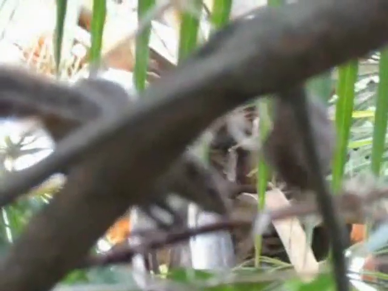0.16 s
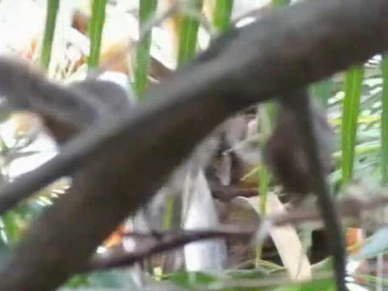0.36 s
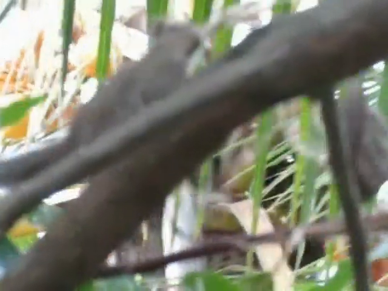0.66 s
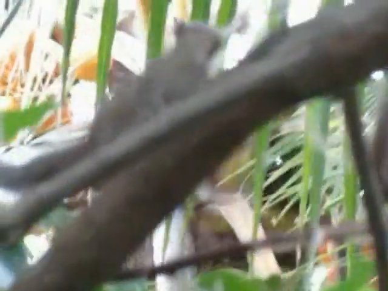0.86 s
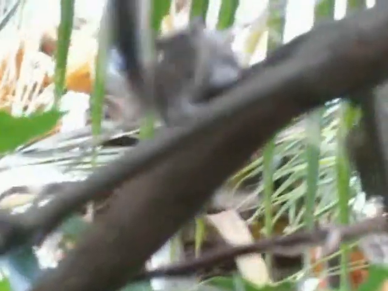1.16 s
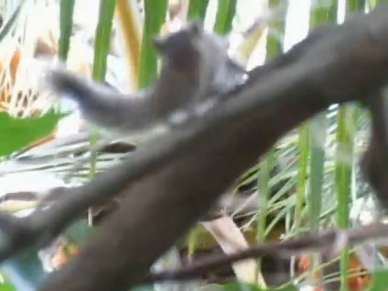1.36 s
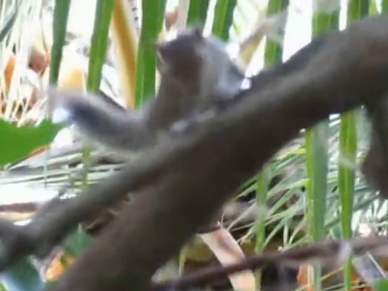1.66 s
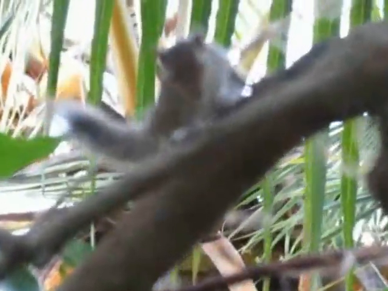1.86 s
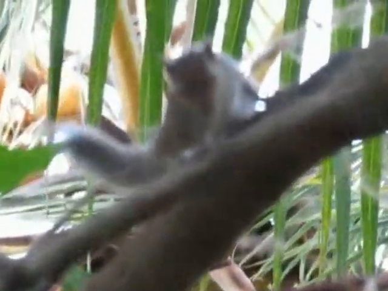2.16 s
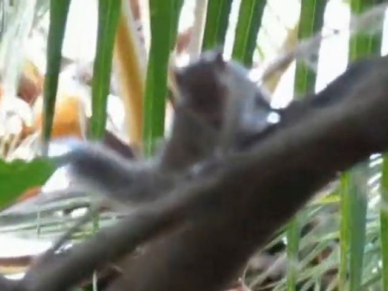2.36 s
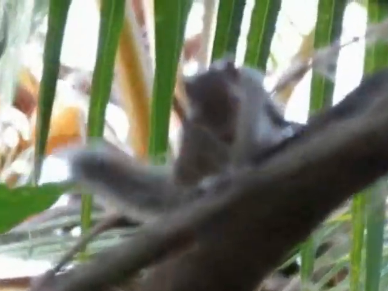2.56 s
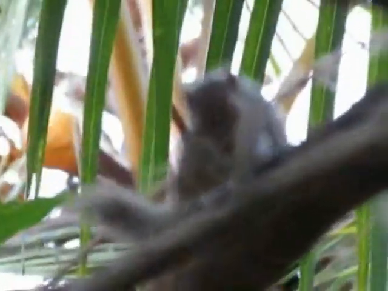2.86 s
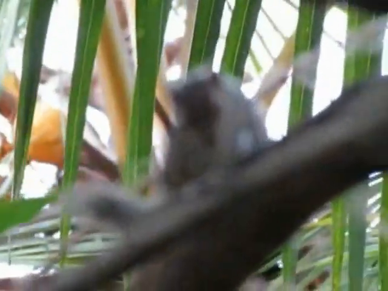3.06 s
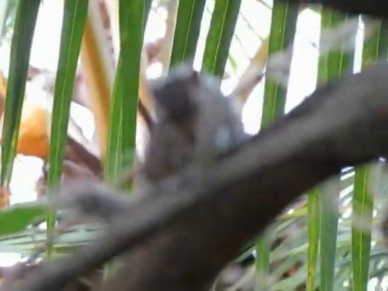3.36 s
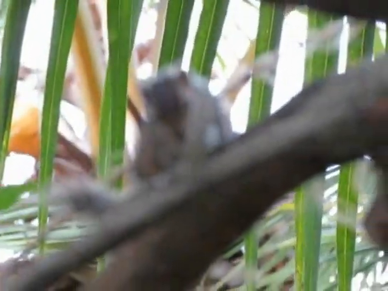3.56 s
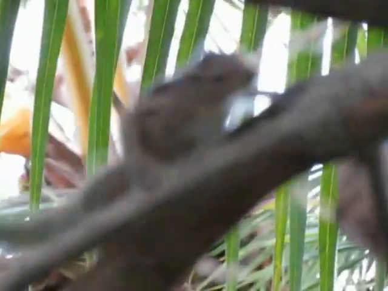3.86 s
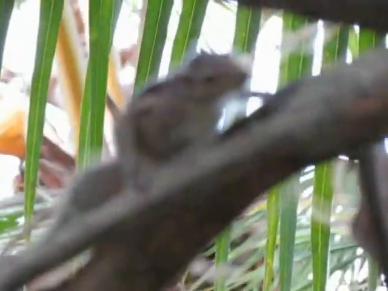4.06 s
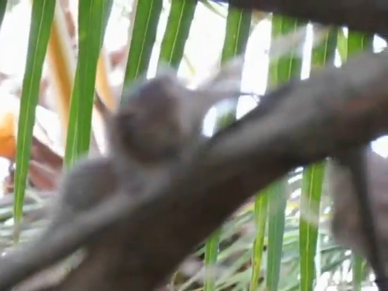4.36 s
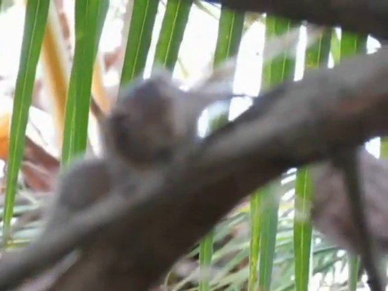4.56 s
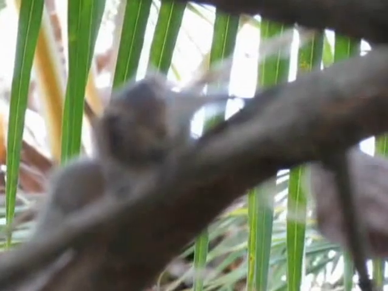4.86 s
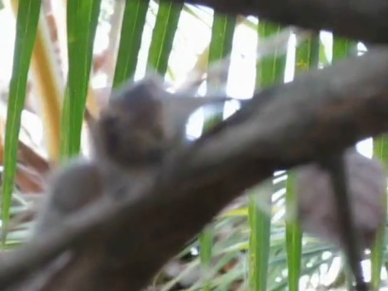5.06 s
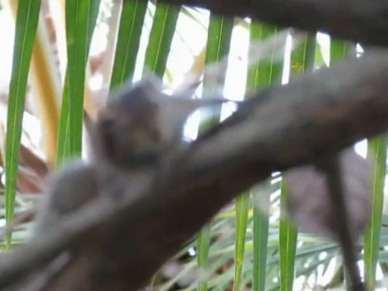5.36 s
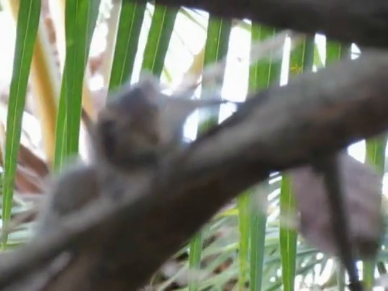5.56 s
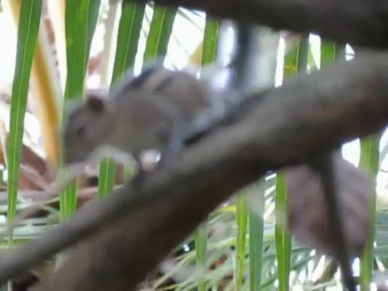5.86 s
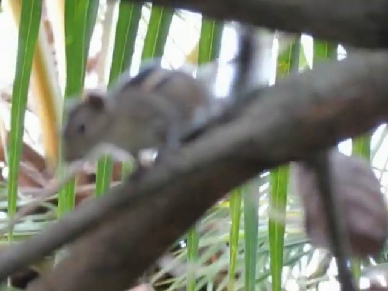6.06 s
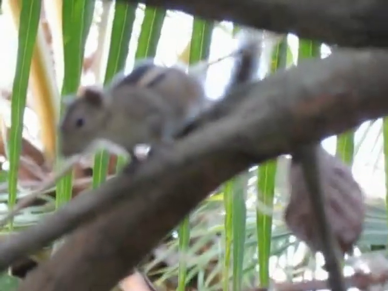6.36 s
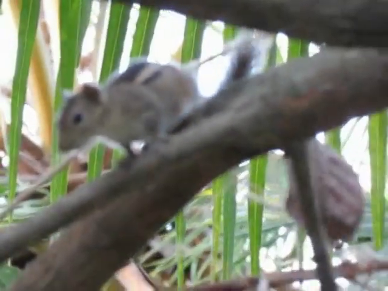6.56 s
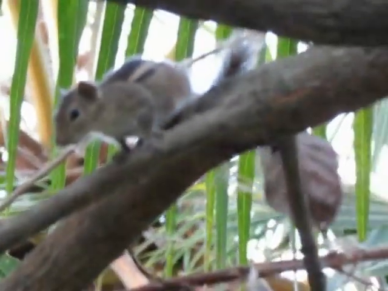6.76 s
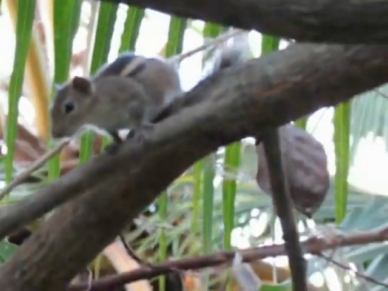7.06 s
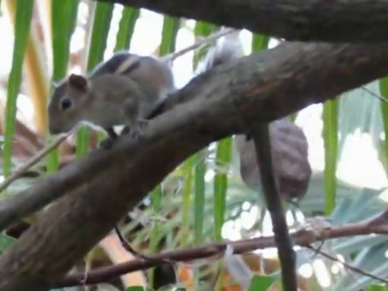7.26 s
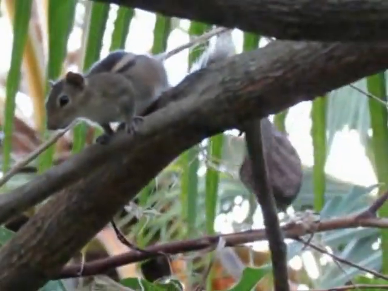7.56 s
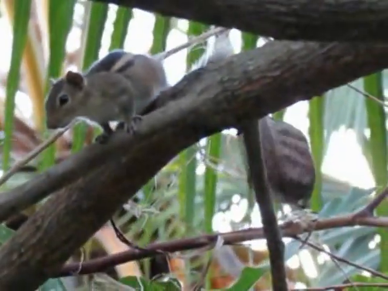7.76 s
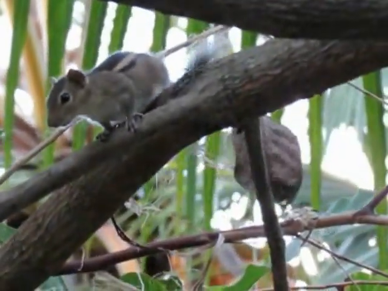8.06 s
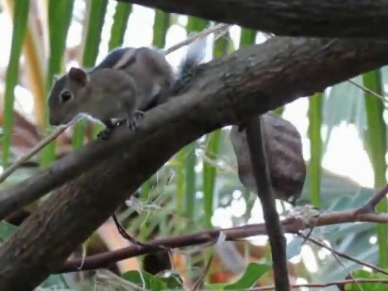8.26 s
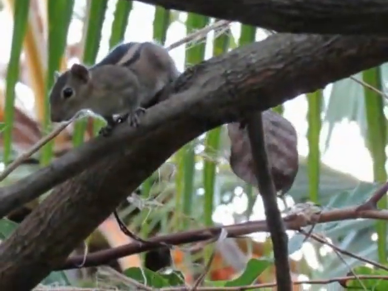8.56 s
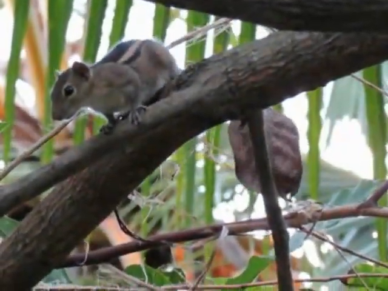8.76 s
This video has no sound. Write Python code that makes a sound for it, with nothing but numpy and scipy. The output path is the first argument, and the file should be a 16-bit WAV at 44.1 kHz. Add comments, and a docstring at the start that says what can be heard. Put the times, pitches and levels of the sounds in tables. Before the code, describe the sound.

Piercing squirrel chirps ring and echo among trees, rapid at first then sparser, with faint far birds, breathy hisses, handling clicks and low traffic wash.

```python
"""Distant traffic, as shaped noise, runs throughout; a faint squirrel chirp opens and short hisses begin to puff.
Louder squirrel chirps follow from the trees of a yard: near-pure arched tones that walls and leaves throw back.
Far birds call in arches from 2 s and peep from 3.2 s, a raspy noise-band chirr swells near 5.2 s,
taps ring the camera body from 5.8 s and horns sound, as fluttering partials, at 6.5 and 8.6 s.
The camera limits peaks, then holds samples off a faster clock, which scatters faint copies of every tone."""
import sys
import numpy as np
from scipy import signal
from scipy.fft import rfft, irfft
from scipy.io import wavfile
from scipy.ndimage import uniform_filter1d

SR = 44100
rng = np.random.default_rng(int(sys.argv[2]) if len(sys.argv) > 2 else 0)


def inscribe(sig):
    """Save sig as 16-bit PCM at rate SR to the path in sys.argv[1].

    A 1-D sig is mono; a 2-D sig holds one channel per row.
    Samples are clipped to [-1, 1] before scaling.
    """
    pcm = np.round(np.clip(np.atleast_2d(sig).T, -1, 1) * 32767)
    wavfile.write(sys.argv[1], SR, pcm.astype(np.int16))


N = 392049
TIME = np.arange(N) / SR


def amp(db):
    """Level law: 20 dB is a factor of ten in amplitude."""
    return 10 ** (np.asarray(db, float) / 20)


def unit(x):
    """Normalization: the sound at rms 1."""
    return x / np.sqrt(np.mean(x ** 2))


def noise(colour):
    """Spectral shaping: white noise weighted by (frequency [Hz], level [dB]) points on a log axis."""
    hz, db = np.transpose(colour)
    bins = np.maximum(np.arange(N // 2 + 1) * SR / N, 1)
    gain = amp(np.interp(np.log(bins), np.log(hz), db))
    return irfft(rfft(rng.standard_normal(N)) * gain, N)


def walk(rate):
    """Random modulation: values drawn at rate [Hz], held, averaged twice over one hold; rms 1."""
    k = int(SR / rate)
    held = np.repeat(rng.standard_normal(N // k + 1), k)
    smooth = uniform_filter1d(uniform_filter1d(held, k), k)
    return unit(smooth[:N])


def add(out, s, x):
    """Superposition: mix x into out from time s [s]."""
    i = max(int(s * SR), 0)
    out[i:i + len(x)] += x[:N - i]


def traffic():
    """Broadband noise: far rumble and hiss whose level drifts slowly."""
    # traffic spectrum: (frequency [Hz], relative level [dB])
    spectrum = [(20, -32), (45, 3), (90, 0.5), (250, -1.5), (400, -7), (850, -8.5), (1300, -14),
                (2200, -14), (3300, -16), (4500, -17), (5600, -23.5), (8000, -25.5), (11000, -24.5),
                (14000, -58)]
    level_db = -40 + 0.84 * walk(2.28)
    return amp(level_db) * unit(noise(spectrum))


def yard(x, wet_db):
    """Reverberation: noise under bunched early reflections and an exponential tail, wet_db [dB] re x in all."""
    # bunches of reflections: (delay [s], spread [s], relative level [dB])
    bunches = [(.015, 0.047, 9), (.057, 0.0077, -9), (.11, .02, -7), (.2, .03, -26)]
    tail_db, tail_t60_s, tail_onset_s = 1, 0.68, 0.022
    t = np.arange(SR) / SR
    decay = 1000 ** (-2 * t / tail_t60_s) * 2 * np.log(1000) / tail_t60_s  # unit energy
    power = amp(2 * tail_db) * decay * np.clip(t / tail_onset_s, 0, 1)
    for delay, spread, db in bunches:
        bell = np.exp(-.5 * ((t - delay) / spread) ** 2) / (spread * np.sqrt(2 * np.pi))
        power += amp(2 * db) * bell
    response = np.sqrt(power) * rng.standard_normal(SR)
    wet = signal.fftconvolve(x, response)
    return amp(wet_db) * wet * np.linalg.norm(x) / np.linalg.norm(wet)


def whistles(calls, rise, bend, onset_db, end_db, octave_db, waver_hz, wet_db):
    """Frequency modulation: a tone nears its top pitch, then slides away; each call has its own reflections."""
    ease = 1.3  # radians of a quarter sine that the slide runs through: it ends before levelling off
    beam_loss_db = 7  # direct sound lost over the slide
    attack_s, release_s = 0.0048, 0.019
    out = np.zeros(N)
    waver = waver_hz * walk(60)
    rasp = 0.85 * walk(250)  # radians
    flutter_db = 2.55 * walk(120)
    for s, length, start_hz, top_hz, end_hz, db, pivot, fall, direct_db in calls:
        u = np.arange(int(length * SR)) / (length * SR)  # share of the call elapsed
        fall = np.clip(fall, 0, .9)
        i = int(s * SR)
        span = slice(i, i + len(u))

        hz = top_hz - (top_hz - start_hz) * np.clip(1 - u / rise, 0, 1) ** 2
        drop = np.clip((u - fall) / (1 - fall), 0, 1) ** bend
        hz -= (top_hz - end_hz) * (np.sin(ease * drop) / np.sin(ease)) ** 2  # the slide eases in
        phase = 2 * np.pi * np.cumsum(hz + waver[span]) / SR
        octave = amp(octave_db) * np.sin(2 * phase + rasp[span])  # the overtone is hoarser

        contour_db = np.interp(u, [0, np.clip(pivot, .05, .9), 1], [onset_db, 0, end_db])
        off_top_db = -1.2 * (top_hz - hz) / 1000  # weaker below the top pitch
        swell = amp(db + contour_db + flutter_db[span] + off_top_db)
        attack = np.clip(u * length / attack_s, 0, 1) ** 0.67
        release = np.clip((1 - u) * length / release_s, 0, 1)
        tone = np.sqrt(2) * swell * attack * release * (np.sin(phase) + octave)

        # the closing mouth beams less: direct sound falls against the echo
        beam_db = direct_db - beam_loss_db * drop
        add(out, s, amp(beam_db) * tone)
        add(out, s, yard(tone, wet_db))
    return out


def call_shapes(calls, start, end, pivot, fall):
    """Similarity: one contour for all calls of a kind, start and end pitch in proportion to the top."""
    return [(s, length, start * hz, hz, end * hz, db, pivot, fall, 0) for s, length, hz, db in calls]


def faint_and_far_calls():
    """Tonal calls: faint squirrel chirps and far bird peeps of flat pitch, and far arched bird notes."""
    # flat calls, faint squirrel chirps at .002 and 1.64 s and far bird peeps:
    # (time [s], length [s], top pitch [Hz], level at the pivot [dB])
    flat_calls = [(.002, 0.075, 5010, -44), (1.64, 0.057, 4550, -29.5), (3.2, 0.072, 5910, -45),
                  (3.37, 0.04, 5950, -47), (4.625, 0.068, 817, -44), (4.66, .062, 3800, -52)]
    # far arched bird calls: (time [s], length [s], top pitch [Hz], level at the pivot [dB])
    arches = [(2.0, 0.088, 1100, -46.5), (4.24, 0.09, 1142, -46), (4.39, 0.1, 1138, -44.5),
              (6.69, 0.1, 1107, -46), (6.865, .09, 1127, -42.5), (7.075, 0.1, 1083, -43)]
    # start and end over top pitch; pivot of the level and start of the slide as shares of the length
    calls = call_shapes(arches, start=.63, end=.61, pivot=.49, fall=.52)
    calls += call_shapes(flat_calls, start=.985, end=.98, pivot=.43, fall=.5)
    return whistles(calls, rise=0.312, bend=1.3, onset_db=9.0, end_db=16.5,
                    octave_db=-16, waver_hz=7.9, wet_db=-4)


def chirp_shapes():
    """Kinematics: pitch drop and slide speed set each chirp's length; top pitch sets its loudest point."""
    # squirrel chirps: (time [s], time until the slide [s], start [Hz], top [Hz], end [Hz], level [dB],
    # direct sound re that level [dB]: lower when hidden or turned away)
    chirps = [ (.168, 0.053, 5226, 5393, 4690, -16.5, -15.5), (0.298, 0.0018, 4520, 4560, 3750, -37, 3),
              (0.318, 0.051, 5140, 5173, 4470, -18, 1.5), (0.521, 0.0056, 4983, 4937, 4360, -16.5, 3),
              (0.632, 0.043, 5130, 5298, 4940, -13, 0), (0.806, 0.023, 4900, 4857, 4080, -18, -1),
              (.965, 0.034, 4684, 4820, 4200, -17, -1.5), (1.118, 0.052, 5107, 5365, 4810, -15.5, 3),
              (1.288, 0.0082, 4813, 4754, 4120, -19, -5), (1.445, .028, 4780, 4928, 4150, -19.5, -2),
              (1.611, 0.074, 4890, 5128, 4680, -15.5, 0), (1.776, 0.052, 5303, 5310, 4330, -22.5, 6.5),
              (2.098, 0.047, 4800, 5055, 4200, -24, 0.5), (2.265, 0.071, 5017, 5302, 4520, -17.5, -2.5),
              (2.45, .015, 4700, 4633, 4010, -21.5, -13), (2.67, .052, 4600, 4824, 4150, -24, 0),
              (2.838, 0.08, 4985, 5200, 4730, -17, 1.5), (3.019, .036, 4930, 4956, 4020, -22, -1),
              (3.21, 0.028, 4700, 4750, 3950, -26, 0), (3.386, 0.093, 4587, 4872, 4280, -21, -0.5),
              (3.555, 0.046, 5054, 5217, 4356, -17.5, 1), (3.775, 0.047, 4420, 4840, 4030, -21.5, -1.5),
              (4.033, 0.042, 5013, 5080, 4250, -21.5, 2), (4.197, 0.011, 4470, 4355, 4040, -29.5, -8),
              (4.488, 0.054, 4936, 5050, 4420, -19.5, 7), (5.046, .026, 4675, 4810, 4330, -26.5, 2.5),
              (5.401, .05, 4936, 4827, 4300, -21.5, 2.5), (5.953, 0.034, 4910, 4824, 4370, -21.5, 0.5),
              (6.098, .009, 4700, 4600, 4320, -30.5, -2), (6.425, .027, 5090, 5090, 4510, -20.5, 1),
              (6.819, 0.047, 5000, 5148, 4560, -21, 4.5), (6.987, 0.0072, 4580, 4720, 4380, -33.5, -7),
              (7.356, 0.028, 5000, 4873, 4420, -25, 3.5), (7.897, 0.034, 5050, 5020, 4610, -23.5, 7.5),
              (8.036, 0.017, 5080, 4980, 4500, -23, 2.5), (8.713, .035, 5290, 5183, 4520, -21, -0.5)]
    slide_s, slide_hz_per_s = 0.02998, 28000  # a set time plus the drop at a set speed
    # high chirps are loudest early, low ones late: share of the length at a middle pitch, its fall per kHz
    crest_share, crest_at_hz, crest_per_khz = 0.59, 5020, 0.8
    rows = []
    for s, hold, start_hz, top_hz, end_hz, db, direct_db in chirps:
        length = hold + slide_s + (top_hz - end_hz) / slide_hz_per_s
        crest = crest_share - crest_per_khz * (top_hz - crest_at_hz) / 1000
        rows.append((s, length, start_hz, top_hz, end_hz, db, crest, hold / length, direct_db))
    return rows


def hiss_times(count=8):
    """Event timing: (time [s], level [dB]) of lone hisses, an even run, and the breath ending each chirp."""
    # lone short hisses: (loudest moment [s], level in the 2 kHz region [dB])
    lone = [(.14, -52), (3.751, -49.5), (3.881, -46.5), (4.93, -49.5), (5.65, -50.5), (6.96, -47),
            (7.142, -44), (7.388, -43.5), (7.52, -52), (7.67, -46.5), (7.769, -44.5), (7.999, -50),
            (8.188, -46.5), (8.322, -45), (8.471, -47.5)]
    run_s, run_gap_s, run_db, run_scatter_db = 5.79, 0.1368, -48, 2.2
    # the breath grows with the chirp's level: dB at the mean chirp, dB per dB
    breath_before_end_s, breath_db, breath_growth = 0.029, -54, 0.36
    run_levels = run_db + run_scatter_db * rng.standard_normal(count)
    run = zip(run_s + run_gap_s * np.arange(count), run_levels)
    s, length, _, _, _, db = np.transpose(chirp_shapes())[:6]
    breath = zip(s + length - breath_before_end_s, breath_db + breath_growth * (db - db.mean()))
    return lone + list(run) + list(breath)


def puffs():
    """Amplitude modulation: grainy hiss swells faster than it fades; three bands flicker independently."""
    # hiss spectrum: (frequency [Hz], relative level [dB])
    hiss_colour = [(400, -2), (1100, -5.5), (2300, 1.5), (3600, 0), (5200, -1.5), (7200, -16.5),
                   (10000, -19.5)]
    hiss = noise(hiss_colour)
    band = signal.butter(4, [1600, 2350], "band", fs=SR, output="sos")
    hiss /= np.std(signal.sosfilt(band, hiss))  # levels refer to this band

    power = np.zeros(N)
    for s, db in hiss_times():
        width_s = np.where(TIME < s, .025, .045)
        power += amp(2 * db) * np.exp(-((TIME - s) / width_s) ** 2)

    low = signal.sosfiltfilt(signal.butter(4, 1900, fs=SR, output="sos"), hiss)
    below_top = signal.sosfiltfilt(signal.butter(4, 3300, fs=SR, output="sos"), hiss)
    parts = (low, below_top - low, hiss - below_top)
    flickering = sum(amp(1.44 * walk(25)) * part for part in parts)
    grain = amp(2.14 * walk(200))
    return grain * np.sqrt(power) * flickering


def squirrels():
    """Near-sinusoidal radiation: arched chirps with a weak octave and strong reflections."""
    return whistles(chirp_shapes(), rise=0.448, bend=1.05, onset_db=-5.0, end_db=-6,
                    octave_db=-18.5, waver_hz=19.2, wet_db=3.0)


def chirr():
    """Band-limited noise: a far raspy chirr swells and fades under a bell-shaped envelope."""
    loudest_s, half_length_s = 5.17, .2
    hz, width_hz, level_db = 3100, 290, -47
    colour = [(hz - 2 * width_hz, -60), (hz - width_hz / 2, 0), (hz + width_hz / 2, 0), (hz + 2 * width_hz, -60)]
    envelope = np.exp(-((TIME - loudest_s) / half_length_s) ** 2)
    return amp(level_db + 2.0 * walk(46)) * unit(noise(colour)) * envelope


def taps():
    """Modal excitation: fingers tap the camera, and a 1 ms scuff rings its plastic body."""
    # taps: (time [s], peak level [dB])
    hits = [(5.789, -17), (5.827, -25), (5.903, -25), (7.453, -23)]
    # body modes: (frequency [Hz], relative level [dB], decay by 60 dB [s])
    modes = [(620, 12, 0.012), (1390, 17, 0.0068), (2650, 9, 0.026), (3170, -18, .02)]
    out, t = np.zeros(N), np.arange(3000) / SR
    ring = sum(amp(db) * np.sin(2 * np.pi * hz * t) * 1000 ** (-t / t60) for hz, db, t60 in modes)
    scuffs = rng.standard_normal((len(hits), 44))
    for (s, db), scuff in zip(hits, scuffs):
        hit = np.convolve(ring, scuff)
        add(out, s, amp(db) * hit / np.abs(hit).max())
    return out


def horns():
    """Additive synthesis: steady partials, each fluttering in level alone, with their reflections."""
    # horns in far traffic: (time [s], length [s], [(frequency [Hz], level [dB])])
    blasts = [(6.53, 0.24, [(1416, -49)]), (8.55, 0.252, [(705, -67), (2713, -58), (3101, -63),
              (3440, -53.5), (3871, -54), (4237, -62)])]
    out = np.zeros(N)
    for s, length, partials in blasts:
        t = np.arange(int(length * SR)) / SR
        edges = np.clip(np.minimum(t, length - t) / 0.0099, 0, 1)
        tone = np.zeros(len(t))
        for hz, db in partials:
            flutter_db = 3.5 * walk(70)[:len(t)]
            tone += amp(db + flutter_db) * np.sin(2 * np.pi * hz * t)
        add(out, s, np.sqrt(2) * edges * tone)
    return out + yard(out, -6.0)[:N]


def scene():
    """Superposition: all sources add linearly."""
    calls = faint_and_far_calls() + squirrels()
    return (traffic() + calls + puffs() + chirr() + taps() + horns())[None]


def limit(x):
    """Dynamic compression: the camera's limiter turns down the loudest peaks by short-time power."""
    ceiling_db, smoothing_s = -8, .003  # rms ceiling
    power = uniform_filter1d(x ** 2, int(smoothing_s * SR), axis=1)
    return x * (1 + (power / amp(2 * ceiling_db)) ** 3) ** (-1 / 6)


def record(dry):
    """Sample-and-hold imaging: earlier samples of a fast clock are held at a slower rate, then low-passed."""
    clock_hz, kept_hz, top_hz = 48000, 22050, 15450
    fast = signal.resample_poly(limit(dry), clock_hz // 300, SR // 300, axis=1)
    ticks = np.arange(N) * kept_hz // SR
    # nearest earlier sample, with no smoothing before it is picked
    picks = np.minimum(ticks * clock_hz // kept_hz, fast.shape[1] - 1)
    held = fast[:, picks]
    lowpass = signal.ellip(10, .2, 80, top_hz, fs=SR, output="sos")
    return signal.sosfilt(lowpass, held)


dry = scene()
out = record(dry)
inscribe(out)
```